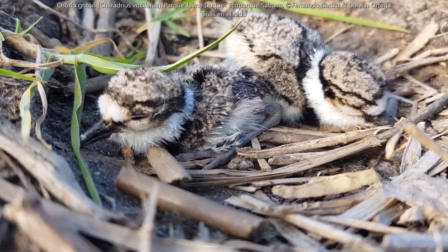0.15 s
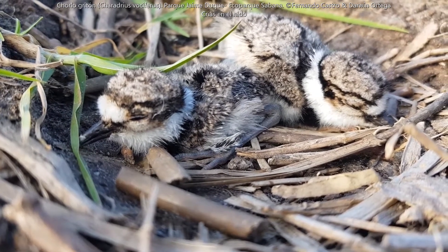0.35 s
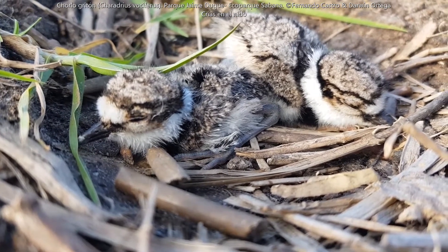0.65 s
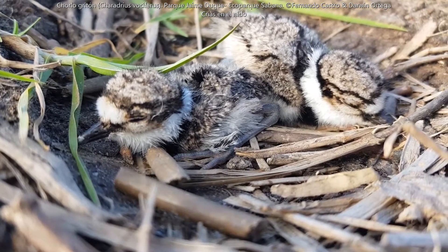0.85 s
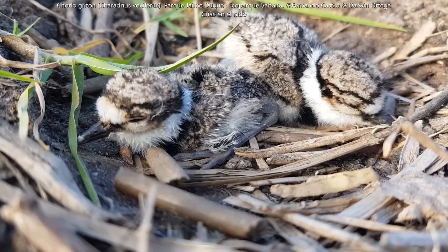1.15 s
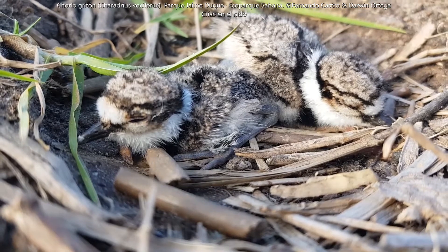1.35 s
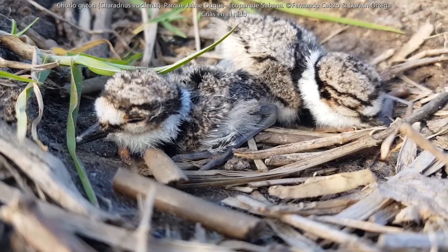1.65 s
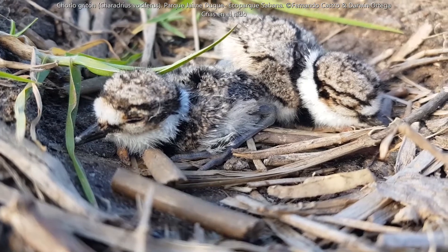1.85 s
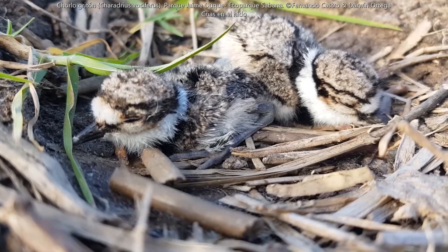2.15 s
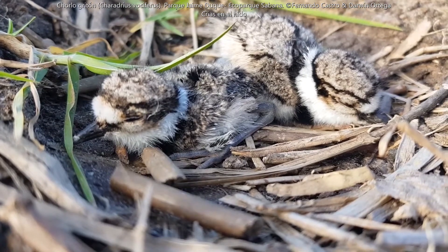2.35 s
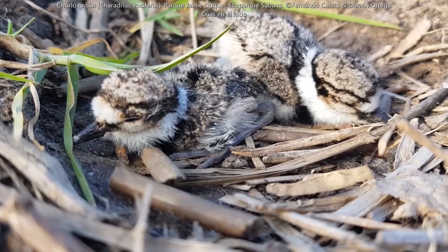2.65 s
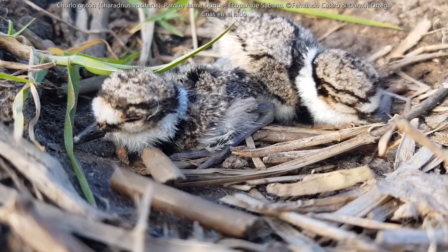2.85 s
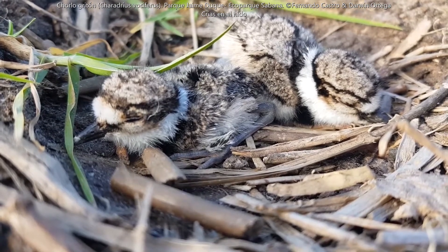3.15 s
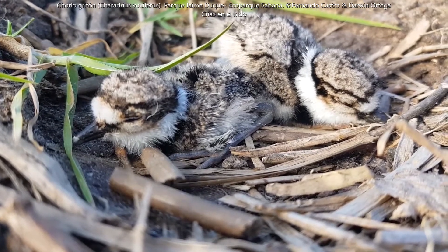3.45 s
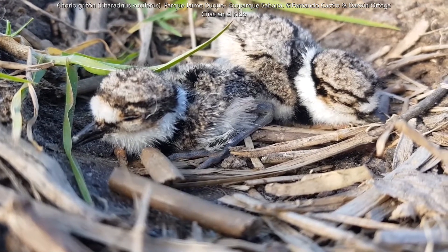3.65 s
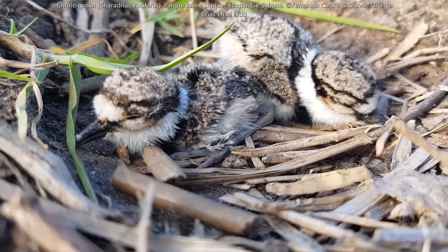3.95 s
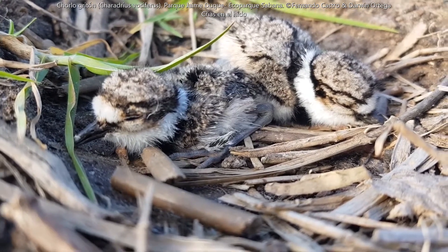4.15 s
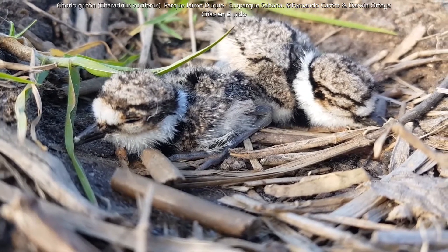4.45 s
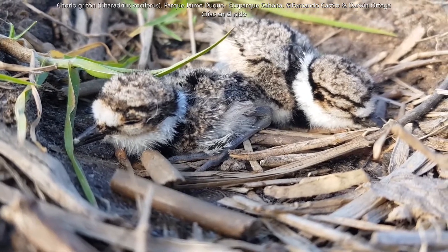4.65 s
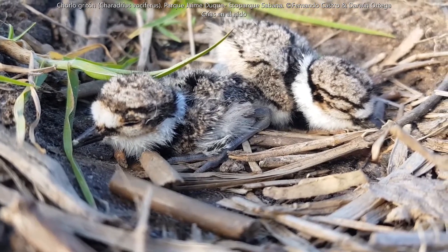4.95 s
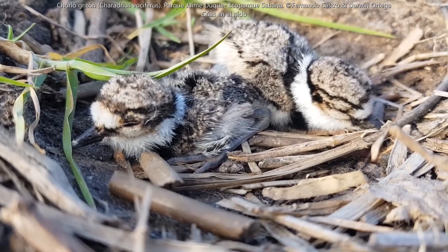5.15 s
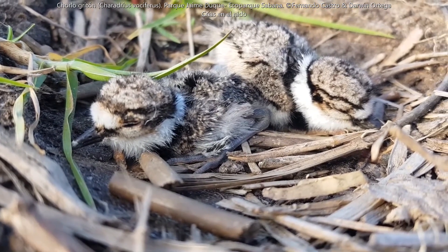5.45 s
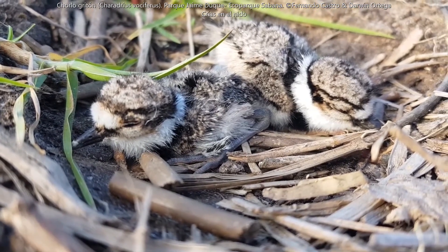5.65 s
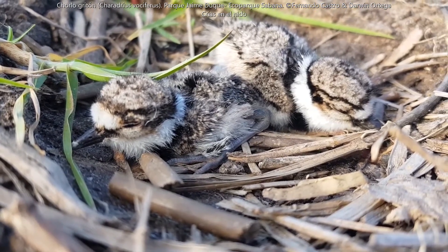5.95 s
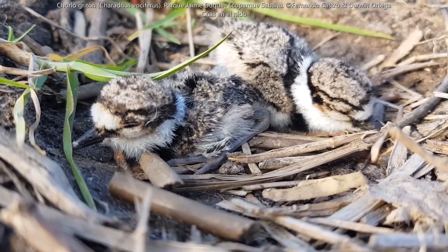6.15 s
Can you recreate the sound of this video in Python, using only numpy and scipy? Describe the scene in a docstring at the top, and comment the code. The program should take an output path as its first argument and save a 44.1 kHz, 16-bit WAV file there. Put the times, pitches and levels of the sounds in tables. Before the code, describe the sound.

Open ground outdoors, low wind rumbling at the microphone. At once a small plover close on the left gives a brief high, creaky call full of rapid ticks. A dry stalk cracks, then faint thin peeps and falling whistles come from farther off. Past the middle the near bird gives one loud, sharp, upswept whistle; litter rustles softly, and quiet nasal clucks repeat with climbing peeps to the end.

```python
"""Open country: a plover close on the left gives a creaky, ticking call and later a loud rising whistle.
The near voice is a gliding sine with noise side bands and short rings; farther peeps and nasal clucks
are harmonic stacks, and falling whistles, a thin trill and faint pips are sine glides.
A dry stalk cracks and litter rustles (decaying ring, grainy noise); shaped random spectra make the low
wash of the country and the wind at the microphone ports, with a drone that grows."""
import sys
import numpy as np
from scipy import signal
from scipy.fft import rfft, irfft
from scipy.io import wavfile
from scipy.ndimage import uniform_filter1d

SR = 44100
rng = np.random.default_rng(int(sys.argv[2]) if len(sys.argv) > 2 else 0)


def file_out(sig):
    """Save sig as 16-bit WAV at sys.argv[1]."""
    # one column per channel
    cols = np.atleast_2d(sig).T
    # limit, then scale
    lim = np.clip(cols, -1, 1)
    pcm = np.round(lim * 32767).astype(np.int16)
    wavfile.write(sys.argv[1], SR, pcm)


N = 278271  # samples

# Levels of the sources are those before place() spreads them over the two ports.
# Near bird's whistle, one contour a call: time_s, pitch_hz, level_db
NEAR_CALLS = [
    [(.018, 4717, -53.5), (.028, 4503, -16), (.051, 4469, -16.5), (.059, 4374, -27), (.09, 4200, -29),
     (.155, 4035, -52), (.162, 4120, -31), (.21, 4130, -25), (.222, 4200, -36), (.281, 4420, -40),
     (.287, 4440, -21.5), (.318, 3665, -21), (.333, 3230, -42.5)],
    [(3.654, 2970, -45), (3.66, 3420, -29.5), (3.669, 3980, -15.5), (3.692, 4520, -17), (3.72, 4710, -16),
     (3.745, 4650, -14.5), (3.765, 4530, -13), (3.79, 4516, -17.5), (3.865, 4670, -15.5),
     (3.895, 4655, -21), (3.96, 4900, -27), (3.98, 4895, -33), (3.992, 4850, -57.5)],
]
# Dips in the whistle's level: time_s, half_width_s, depth_db
LEVEL_DIPS = [(.297, 0.0027, -28.5), (3.678, 0.0078, -12.5), (3.809, .004, -2.5)]
# Upward skips of its pitch: start_s, length_s, skip_hz
PITCH_SKIPS = [(3.792, .013, 140), (3.804, .016, 124.6)]
# Hoarse spells, 20 dB down at the swell and fade times: time_s, level_db, swell_s, fade_s
HOARSE_SPELLS = [(0.021, -24.5, .02, .01), (.051, -26, 0.067, 0.09), (.15, -43.5, .1, 0.29),
                 (3.69, -44.5, 0.0796, .1), (3.727, -27.5, .015, 0.036), (3.742, -30.5, 0.055, .018),
                 (3.765, -37.5, 0.038, .05), (3.794, -36, .008, .014), (3.811, -39, .015, .02),
                 (3.84, -50, .1, .08), (3.98, -54, .035, 0.095)]
# The voice locks to every third cycle: start_s, length_s, side_tone_db (under the whistle)
THIRD_LOCK = (3.741, 0.0099, -16.5)
# Single snaps of the voice in the creaky call: time_s, level_db, ring_hz
TICKS = [(0.0039, -20, 4400), (0.0124, -24, 4850), (0.0172, -24, 4840), (0.0799, -27, 4570),
         (0.0835, -29, 4660), (0.0877, -28, 4460), (0.0914, -30, 4390), (0.0935, -28, 4370),
         (0.0999, -26, 4320), (0.1038, -20, 4260), (0.1111, -23, 4020), (0.1163, -34, 4360),
         (0.1226, -24, 4090), (0.1365, -30, 4280), (0.1407, -19.5, 4200), (0.1441, -30, 4140),
         (0.1485, -22, 4140), (0.1592, -35, 4160), (0.1624, -21, 4170), (0.1761, -25, 4430),
         (0.1913, -27, 4160), (0.1964, -26, 4120), (0.2032, -31, 4200), (0.213, -25, 4700),
         (0.2252, -29, 4620), (0.2328, -24, 4440), (0.2352, -23, 4460), (0.2592, -24, 4500),
         (0.2643, -24, 4540)]
# Snaps that run together: start_s, length_s, slowest_per_s, fastest_per_s, level_db
BUZZ = (.0195, .0585, 270, 750, -26)
NEAR_OCTAVE_DB, SKIP_EDGE_S, BUZZ_RING_HZ = -27.5, .002, 4700

# Nasal clucks: start_s, length_s, rise_s (to the top), hold_s, top_pitch_hz, level_db, change_at_top_db
CLUCKS = [(3.285, 0.065, .022, 0.013, 814, -52.5, -8), (4.076, 0.12, .014, 0.016, 835, -42.5, -5.5),
          (4.555, 0.11, 0.016, 0.0098, 846, -41, -4), (4.906, 0.14, 0.025, 0.015, 915, -38, -3),
          (5.232, 0.13, 0.025, 0.02, 933, -36.5, 0), (5.535, 0.015, 0.0054, .003, 920, -44, 1),
          (5.548, 0.027, 0.0091, 0.017, 827, -37.5, -0.5), (5.563, 0.096, .013, .014, 912, -40.5, 1),
          (5.825, 0.13, 0.0253, 0.035, 934, -37.5, 1), (6.102, 0.14, 0.031, 0.035, 936, -39, 2.5)]
# Fixed resonance of the beak: frequency_hz, gain_db
BEAK_RESONANCE = [(900, -25), (1600, -24), (1850, -9), (2100, -11), (2500, 0), (3700, -2), (4150, -17),
                  (4650, -12), (5500, -20), (6600, -36), (8400, -20), (10200, -26), (11800, -42)]
# Colour of the breath noise in a cluck: frequency_hz, gain_db
BREATH_COLOUR = [(1200, -35), (2500, 6.5), (4000, -11), (6000, 5.5), (7000, -7.5), (9000, -2.5),
                 (11400, -13.5), (12000, -34)]
BREATH_DB, BREATH_FOLLOWS = -51, 0.65  # level where the voice is at -39.5 dB; share of its dB swing followed
CLUCK_RISE, CLUCK_START_DB = 0.0705, -9.5  # share of pitch and level short of the top at the start
SAG_HZ_PER_S, SAG_KNEE_S = 5600, 0.0119  # fall of pitch after the hold, and how gradually it sets in
CLUCK_JITTER, ROUGH_START = .003, .04  # rms shares of pitch: throughout, and added at the start
CLUCK_FADE_S, CLUCK_DULL_DB_PER_S = .07, -130  # 20 dB lost this long after the top; extra above harmonic 3

# Long peeps: start_s, end_s, from_hz, to_hz (second harmonic), bend, from_db, to_db,
# bright_from_db, bright_to_db (shift of the harmonics above the second)
PEEPS = [(1.975, 2.33, 3520, 3960, .9, -58, -52, -18, 4),
         (4.476, 4.935, 3490, 3915, 2.3, -55, -49, -15, -9),
         (5.61, 5.755, 3540, 3830, 3.2, -58, -44, -4, -14),
         (5.755, 5.787, 3960, 4000, .9, -52, -54, -3, -3.5)]
# Harmonics of a peep: multiple, level_db
PEEP_HARMONICS = [(1, -11.5), (2, -2.5), (3, -22), (4, -30.5), (5, -17.5)]
# Short notes that lead into a peep: start_s, length_s, top_hz (second harmonic), level_db
LEAD_NOTES = [(1.875, 0.062, 3970, -50.5), (4.429, .05, 4010, -48.5), (5.52, .04, 4150, -49.5)]
LEAD_TOP, LEAD_DROP = .45, .14  # the top as a share of the length; share of pitch lost by the end
LEAD_FADE_DB, LEAD_BRIGHT_DB = -13, -11
PEEP_EDGE_S, PEEP_WAVER_DB = .014, 2.4

# Far falling whistles: start_s, length_s, from_hz, to_hz, bend, loudest_at (share of length), level_db
WHISTLES = [(2.19, .11, 4250, 2720, 1.3, 0.25, -57), (2.768, .44, 4490, 2420, 1.13, 0.28, -56.5),
            (5.339, 0.18, 4220, 3090, 1.3, 0.26, -64)]
# Thin trill: start_s, length_s, middle_hz, swing_hz, turns_per_s, from_db, to_db
TRILL = (.857, .163, 6250, 560, 21.3, -82, -74)
# Faint pips: start_s, pitch_hz, level_db, length_s
PIPS = [(3.437, 3200, -65, .014), (3.527, 3190, -64.5, 0.018), (3.63, 3170, -64.5, 0.02)]
WHISTLE_FADE_DB, PIP_DROOP = -21, .97  # level lost at either end; end pitch over start pitch

# Crack of a dry stalk: time_s, peak_db
CRACKS = [(0.5542, -33.5)]
# Rustle in the litter: start_s, swell_s, fade_s, level_db
RUSTLE = (3.87, .03, .37, -45)
# Colour of the rustle: frequency_hz, gain_db
RUSTLE_COLOUR = [(700, -30), (1300, 2.5), (2500, 0.5), (4000, -15.5), (7000, -37), (12000, -65)]
RUSTLE_EDGE_DB = -14

# Spectrum of wash and wind together: frequency_hz, relative_level_db
WASH_SPECTRUM = [(15, -8.5), (54, -2), (130, -1.5), (180, -10), (290, -9), (380, -10.5), (700, -17.5),
                 (1240, -22.5), (2300, -35.5), (2900, -42), (4200, -40.5), (6200, -50), (6700, -64),
                 (10000, -53.5), (11500, -57), (12000, -78.5), (15500, -90.5)]
# Slow gusting: time_s, change_db
WASH_GUSTS = [(0.0, -1.5), (6.31, -0.5)]
# Likeness of the wash at the two ports: frequency_hz, shared_part
PORT_LIKENESS = [(25, .45), (70, .58), (150, .9), (400, .86), (800, .55), (1600, .38), (4000, .25),
                 (12000, .2)]
# Balance of the wash: frequency_hz, left_minus_right_db
WASH_BALANCE = [(60, 0), (110, -1), (200, 1), (380, 0.5), (700, 4), (1290, 0), (2380, -3), (4400, -5.5),
                (8120, 0), (15000, 6)]
# Growth of the drone: time_s, lift_db (above the wash)
DRONE_GROWTH = [(0, 3.5), (4, 3.2), (5, 9), (6.31, 9)]
DRONE_HZ, DRONE_WIDTH_HZ = 291.5, 13
WASH_DB, WASH_LAG = -39, 17.2  # rms level; samples by which the left port hears it later
EDGE_HZ = 16200  # upper band limit


def near_bird():
    """Modulation: a gliding sine carries noise side bands, while impulses ring the windpipe."""
    out = np.zeros(N)
    for contour in NEAR_CALLS:
        start, (hz, db) = unroll(contour)
        t = start + np.arange(len(hz)) / SR
        for at, length, skip_hz in PITCH_SKIPS:
            hz = hz + skip_hz * np.clip(np.minimum(t - at, at + length - t) / SKIP_EDGE_S, 0, 1)
        for at, half_width, depth_db in LEVEL_DIPS:
            db = db + depth_db * np.exp(-((t - at) / half_width) ** 2)
        spells = [top_db - 20 * np.maximum((at - t) / swell, (t - at) / fade)
                  for at, top_db, swell, fade in HOARSE_SPELLS]
        rasp_db = np.max(spells, axis=0)
        phase = 2 * np.pi * np.cumsum(hz) / SR

        # locking to every third cycle adds tones at 2/3 and 4/3 of the pitch
        lock_start, lock_length, side_db = THIRD_LOCK
        lock = amp(side_db) * np.clip(1 - ((t - lock_start) / lock_length * 2 - 1) ** 4, 0, 1)
        tone = np.sin(phase) + lock * (np.sin(phase * 2 / 3) + 0.18 * np.sin(phase * 4 / 3))

        # low-frequency noise times the carrier gives side bands around the whistle
        flutter_colour = [(300, -4.5), (1200, -10), (1900, -20), (2800, -24), (5000, -52.0)]
        flutter = evened(coloured(rng.standard_normal(len(hz)), flutter_colour))
        rasp = amp(rasp_db + 1.9 * wobble(len(hz), 54)) * flutter
        octave = amp(NEAR_OCTAVE_DB) * (amp(db) + 3.35 * rasp) * np.sin(2 * phase)
        whistle = amp(db + 0.42 * wobble(len(hz), 90)) * tone
        voice = whistle + rasp * np.cos(phase) + octave
        add(out, start, voice * signal.windows.tukey(len(hz), .02))
    for at, db, ring_hz in list(TICKS) + buzz_snaps():
        add(out, at - 60 / SR, amp(db) * snap(ring_hz))
    return place(out, lean_db=6.2, lag=-16.1, wet_db=-19)


def buzz_snaps():
    """Pulse-rate fusion: snaps quicken, then slow, with unequal gaps, and are heard as a buzz."""
    start, length, slowest, fastest, level_db = BUZZ
    before, after = sides(np.arange(0, length, 1 / SR) / length, .25)
    rate = fastest - (fastest - slowest) * (before + after)
    count = np.cumsum(rate * (1 + .25 * wobble(len(rate), 64))) / SR
    onsets = np.flatnonzero(np.diff(np.floor(count)))
    chances = rng.standard_normal((99, 2))
    return [(start + i / SR, level_db + 2 * u, BUZZ_RING_HZ * (1 + 0.06 * v))
            for i, (u, v) in zip(onsets, chances)]


def snap(hz):
    """Impulse response: a few cycles of windpipe ring under a sharp peak, with a faint octave."""
    t = np.arange(-60, 120) / SR
    bell = 1.7 * np.exp(-(abs(t) / np.where(t < 0, .00045, .00065)) ** 1.4)
    return bell * (np.sin(2 * np.pi * hz * t) + 0.041 * np.cos(4 * np.pi * hz * t))


def clucks():
    """Source and filter: a harmonic stack of arched, falling pitch passes a fixed beak resonance."""
    out = np.zeros(N)
    for start, length, rise, hold, top_hz, top_db, change_db in CLUCKS:
        t = np.arange(0, length, 1 / SR) - rise  # zero at the top
        before, after = np.clip(-t / rise, 0, 1), np.maximum(t, 0)
        knee = np.hypot(after - hold, SAG_KNEE_S) - np.hypot(hold, SAG_KNEE_S)
        hz = top_hz * (1 - CLUCK_RISE * before ** 2) - SAG_HZ_PER_S / 2 * (knee + after)
        db = top_db + CLUCK_START_DB * before ** 0.97 - 20 * (after / CLUCK_FADE_S) ** 2.03
        db = db + change_db * np.exp(-(t / .01) ** 2)
        roughness = (CLUCK_JITTER + ROUGH_START * before ** 2) * wobble(len(hz), 82)
        phase = 2 * np.pi * np.cumsum(hz * (1 + roughness)) / SR
        voiced = np.zeros(len(hz))
        for k in range(1, 15):
            dulling_db = CLUCK_DULL_DB_PER_S * after * (k > 3)
            harmonic_db = read(BEAK_RESONANCE, k * hz) + dulling_db + 2.6 * wobble(len(hz), 260)
            voiced += amp(harmonic_db) * np.sin(k * phase)
        breath = evened(coloured(rng.standard_normal(len(hz)), BREATH_COLOUR))
        breath = breath * amp(BREATH_DB + BREATH_FOLLOWS * (db + 39.5))
        add(out, start, (amp(db) * voiced + breath) * signal.windows.tukey(len(hz), .08))
    return place(out, lean_db=-2.5, lag=3.2, wet_db=-7)


def peeps():
    """Harmonic series in a glide: short notes arch and drop, long ones climb."""
    out = np.zeros(N)
    for start, length, top_hz, top_db in LEAD_NOTES:
        before, after = sides(np.arange(0, length, 1 / SR) / length, LEAD_TOP)
        hz = top_hz * (1 - .035 * before ** 2 - LEAD_DROP * after ** 2)
        db = top_db + LEAD_FADE_DB * (before ** 2 + after)
        add(out, start, peep(hz, db, LEAD_BRIGHT_DB) * signal.windows.tukey(len(hz), .2))
    for start, end, from_hz, to_hz, bend, from_db, to_db, bright_from_db, bright_to_db in PEEPS:
        length = end - start
        u, done, hz = glide(length, from_hz, to_hz, bend)
        db = from_db + (to_db - from_db) * done + PEEP_WAVER_DB * wobble(len(u), 1050)
        bright_db = bright_from_db + (bright_to_db - bright_from_db) * u
        edges = np.clip(np.minimum(u, 1 - u) * length / PEEP_EDGE_S, 0, 1)
        add(out, start, peep(hz, db, bright_db) * edges)
    return place(out, lean_db=-2.2, lag=-1, wet_db=-6)


def peep(hz, db, bright_db):
    """Harmonic series led by its second member (hz); brightness shifts the members above it."""
    phase = np.pi * np.cumsum(hz) / SR  # of the fundamental
    stack = sum(amp(level_db + bright_db * (k > 2)) * np.sin(k * phase) for k, level_db in PEEP_HARMONICS)
    return np.sqrt(2) * amp(db) * stack


def whistles():
    """Pure tones under frequency modulation: falling glides, a trill and drooping pips waver in level."""
    out, notes = np.zeros(N), []
    for start, length, from_hz, to_hz, bend, top, db in WHISTLES:
        u, _, hz = glide(length, from_hz, to_hz, bend)
        notes.append((start, hz, db + WHISTLE_FADE_DB * sum(sides(u, top))))
    start, length, middle_hz, swing_hz, turns_per_s, from_db, to_db = TRILL
    t = np.arange(0, length, 1 / SR)
    trill_hz = middle_hz + swing_hz * np.cos(2 * np.pi * turns_per_s * t)
    notes.append((start, trill_hz, from_db + (to_db - from_db) * t / length))
    for start, hz, db, length in PIPS:
        notes.append((start, glide(length, hz, hz * PIP_DROOP, 1)[2], db))
    for start, hz, db in notes:
        tone = np.sin(2 * np.pi * np.cumsum(hz) / SR) * signal.windows.tukey(len(hz), 350 / len(hz))
        add(out, start, np.sqrt(2) * amp(db + 2.3 * wobble(len(hz), 400)) * tone)
    return place(out, lean_db=-2.9, lag=1.2, wet_db=-5)


def litter():
    """Fracture and friction: a fast-decaying ring for the stalk, grainy noise for the rustle."""
    crack, rustle = np.zeros((2, N))
    t = np.arange(80) / SR
    for at, db in CRACKS:
        add(crack, at, amp(db - 60 * t / 0.00063) * np.cos(2 * np.pi * 2600 * t))
    start, swell, fade, top_db = RUSTLE
    length = swell + fade
    u = np.arange(0, length, 1 / SR) / length
    db = top_db + RUSTLE_EDGE_DB * sum(sides(u, swell / length))
    grains = rng.standard_normal(len(db)) * amp(3.5 * wobble(len(db), 160))
    add(rustle, start, amp(db) * evened(coloured(grains, RUSTLE_COLOUR)))
    near = place(crack, lean_db=.5, lag=1, wet_db=-14)
    return near + place(rustle, lean_db=1.0, lag=9.0, wet_db=-2.0)


def wash():
    """Partial coherence: random short-time spectra share most at low and lower-middle frequencies."""
    frames, hz = N // 512 + 5, np.fft.rfftfreq(2048, 1 / SR)
    t = np.arange(frames) * 512 / SR
    a, b, c, d, patches = rng.standard_normal((frames, 1025, 5)).T
    # faint patches: a level field smoothed over frequency and time
    patches = evened(uniform_filter1d(uniform_filter1d(patches, 20, 0), 8, 1))
    gust_db = np.interp(t, *np.transpose(WASH_GUSTS))
    drone_band = np.exp(-((hz[:, None] - DRONE_HZ) / DRONE_WIDTH_HZ) ** 2)
    drone_db = drone_band * np.interp(t, *np.transpose(DRONE_GROWTH))

    shared = np.clip(read(PORT_LIKENESS, hz), 0, 1)[:, None]
    early = np.exp(2j * np.pi * hz * WASH_LAG / SR)[:, None]
    left = a + 1j * b
    right = shared * early * left + np.sqrt(1 - shared ** 2) * (c + 1j * d)
    ports = np.array([left, right])
    ports *= amp(read(WASH_BALANCE, hz)[:, None] / 2 * np.array([1, -1])[:, None, None])
    ports *= amp(read(WASH_SPECTRUM, hz)[:, None] + 0.99 * patches + gust_db + drone_db)
    return amp(WASH_DB) * evened(signal.istft(ports, nperseg=2048, noverlap=1536)[1][:, :N])


def place(x, lean_db, lag, wet_db):
    """Stereo cues: level balance, lag of the left in samples, and short scatter from stalks and ground."""
    cycles = np.fft.rfftfreq(N)  # per sample
    shift = np.exp(-1j * np.pi * cycles * lag * np.array([[1], [-1]]))
    direct = irfft(rfft(x) * shift, N) * amp(lean_db / 2 * np.array([[1], [-1]]))
    t = np.arange(4000) / SR
    # scatter starts after 4 ms and loses 60 dB in 78 ms
    scatter = rng.standard_normal((2, len(t))) * amp(-60 * t / 0.078) * (t > .004)
    scatter = scatter / np.linalg.norm(scatter[0])
    return direct + amp(wet_db) * signal.oaconvolve(x[None], scatter, axes=1)[:, :N]


def glide(length, from_hz, to_hz, bend):
    """Glide law: share of note passed, share of glide done (early if bend is over 1), and pitch."""
    u = np.arange(0, length, 1 / SR) / length
    done = 1 - (1 - u) ** bend
    return u, done, from_hz + (to_hz - from_hz) * done


def sides(u, top):
    """Piecewise-linear contour: distance before and after the top of a note, each 0-1."""
    return np.clip(1 - u / top, 0, 1), np.clip((u - top) / (1 - top), 0, 1)


def unroll(rows):
    """Linear interpolation: start time and the columns of a contour at sample rate."""
    s, *columns = np.transpose(rows)
    t = np.arange(s[0], s[-1], 1 / SR)
    return s[0], [np.interp(t, s, column) for column in columns]


def wobble(size, span):
    """Moving average: noise smoothed twice over a span in samples, at rms 1."""
    once = uniform_filter1d(rng.standard_normal(size), int(span))
    return evened(uniform_filter1d(once, int(span)))


def coloured(x, points):
    """Linear filtering: multiplies the Fourier spectrum by a gain curve."""
    return irfft(rfft(x) * amp(read(points, np.fft.rfftfreq(len(x), 1 / SR))), len(x))


def read(points, hz):
    """Logarithmic frequency scale: looks a curve up on a log axis."""
    f, value = np.transpose(points)
    return np.interp(np.log(hz + 1), np.log(f + 1), value)


def amp(db):
    """Decibel law: amplitude gain of a level."""
    return 10 ** (np.asarray(db) / 20)


def evened(x):
    """Mean power: scales to rms 1."""
    return x / np.sqrt(np.mean(x ** 2) + 1e-20)


def add(mix, s, sound):
    """Superposition: adds a sound at a time in seconds."""
    part = mix[round(s * SR):][:len(sound)]
    part += sound[:len(part)]


def scene():
    """Superposition of all sources at the two ports."""
    return near_bird() + clucks() + peeps() + whistles() + litter() + wash()


def record(dry):
    """Band limitation: a symmetric low-pass removes the sound above the edge."""
    low_pass = signal.firwin(511, EDGE_HZ, window=("kaiser", 9), fs=SR)
    return signal.oaconvolve(dry, low_pass[None], "same")


dry = scene()
out = record(dry)
file_out(out)
```